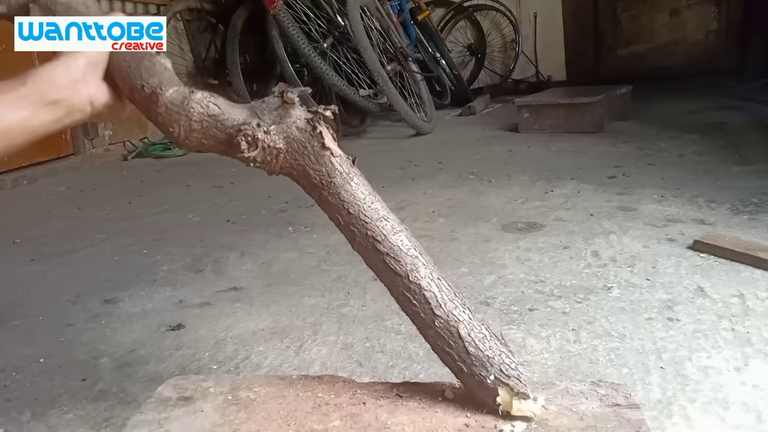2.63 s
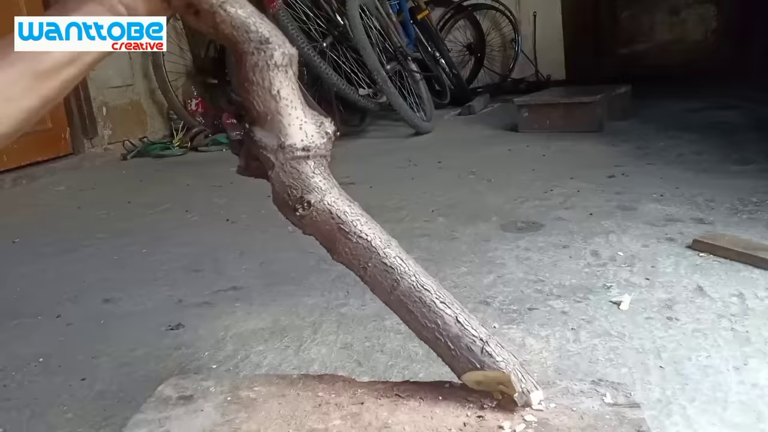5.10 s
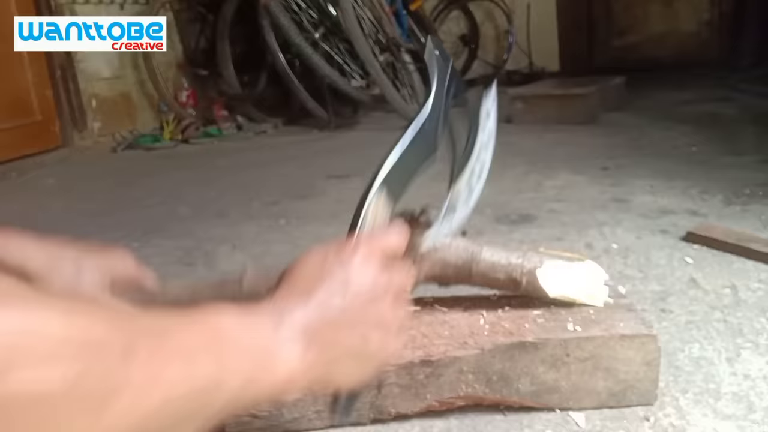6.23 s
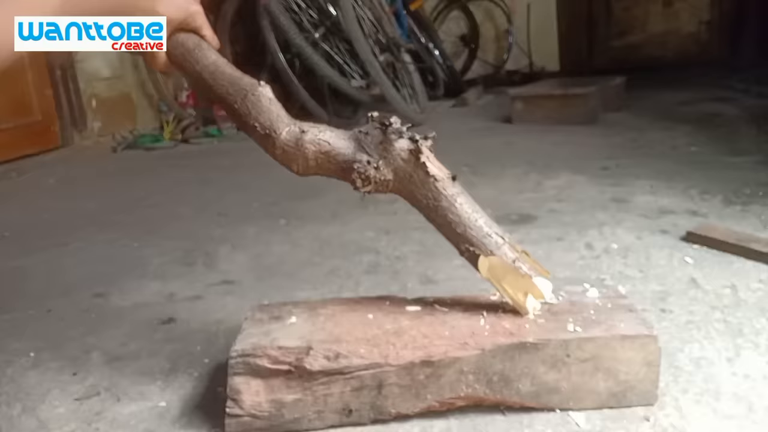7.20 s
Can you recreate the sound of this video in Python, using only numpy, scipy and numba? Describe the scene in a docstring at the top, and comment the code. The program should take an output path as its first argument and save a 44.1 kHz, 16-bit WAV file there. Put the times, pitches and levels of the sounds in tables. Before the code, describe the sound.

A close stereo pickup in a walled yard with short hard echoes, over low far traffic rumble, a soft broad hum and thin hiss. From 0 to 0.6 seconds tiny chips tick down and steel rings very faintly. A light tap at 1.0 leads through a faint swish to a loud cracking chop at 1.65, with woody rattles and bouncing pieces until about 1.95, then an instant dip. A tap at 2.3 and a ringing chop at 3.0 bring small knocks, brief squeaks, a faint gliding bird near 3.8 and two wooden knocks around 4.0. A tap at 4.9 precedes another sharp chop at 5.5, then falling chips and faint squeaks near 5.9. The level dips briefly at 6.2, with dull soft knocks around 6.4. A brighter tap at 6.95 leads to the last heavy chop at 7.6, with a thumping block and a few dropping chips until about 8.1.

```python
"""A walled yard: a steel axe chops a branch on a wooden block, close to two microphone ports that hear it differently.
Chips drop and the blade rings faintly, then light taps aim four chops, each led by a swish; wood bounces and knocks after.
The second chop brings squeaks and a far gliding bird, the third more squeaks; the level dips near 2.0 and 6.2 s.
Noise and a jolt make each crack, ring branch and block and set off decaying noise for the walls; tones are wavering sines.
Shaped noise lies under it all: far traffic rumble, a broad hum and a thin hiss."""
import sys
import numpy as np
from scipy import signal
from scipy.fft import rfft, irfft, next_fast_len
from scipy.io import wavfile
from scipy.ndimage import uniform_filter1d, map_coordinates
from numba import njit

SR = 44100
rng = np.random.default_rng(int(sys.argv[2]) if len(sys.argv) > 2 else 0)


def dump(signal):
    """Clip the signal to [-1, 1] and save it as 16-bit WAV at the path in sys.argv[1]."""
    limited = np.clip(np.atleast_2d(signal).T, -1, 1)
    pcm = np.round(limited * 32767).astype(np.int16)
    wavfile.write(sys.argv[1], SR, pcm)


def ratio(d):
    """dB to gain"""
    e = np.asarray(d, float) / 20
    return 10 ** e


N = 359856

# Levels are as at the source: port colour, pan, dips and gain control come later.
# Steel edge on the branch, full chops and light aiming taps; the jolt comes 1 ms after t, as in all contact tables:
# (t/s, crack peak level/dB, block level/dB, branch level/dB, branch f/Hz, edge brightness/dB)
CHOPS = [(0.9825, -25, -32, -38.5, 1580, -11.5), (1.6573, 1.5, -10.5, 3.5, 1000, -11.5),
         (2.3396, -25.5, -29.5, -43, 1470, -10.5), (2.9991, -5.5, -30.5, -8.5, 1480, -8),
         (4.8986, -30, -35, -36, 872, -9.5), (5.5297, -3.5, -15.5, -4, 1420, -11.5),
         (6.951, -24.5, -33.5, -41.5, 1130, -3.5), (7.6188, -1.5, -5.5, -5.5, 1290, -7)]
# Cut pieces bouncing near the listener, with little of the walls:
# (t/s, crack peak level/dB, block level/dB, block f/Hz, branch level/dB, branch f/Hz)
BOUNCES = [(1.7906, -7.5, -15.5, 209, -7.5, 1340), (1.8137, -21, -39.5, 412, -31, 1320),
           (1.8221, 2.5, -12.5, 320, -6, 1320), (1.8999, -12.5, -25, 450, -27, 1540),
           (1.9267, -31.5, -15.5, 452, -24, 1405), (1.9457, -23, -17, 460, -21, 858),
           (3.2234, -39, -28.5, 268, -34.5, 1370), (1.9365, -27.5, -21.5, 425, -23.5, 1200)]
# Wood on wood as the branch jolts and rocks on the block: columns as for the bounces
KNOCKS = [(1.6679, -9, -10, 212, 8.5, 1160), (1.6814, -3.5, -33, 258, -14, 1130),
          (1.705, -34.5, -20, 266, -8, 1170), (3.0072, -13, -11, 245, -2.5, 926),
          (3.0414, -16, -17, 217, -11.5, 1100), (3.2911, -26, -51.5, 270, -37, 1370),
          (3.2989, -20, -36.5, 325, -28, 1510), (3.3113, -41, -52.5, 345, -53, 947),
          (3.3737, -46, -54, 338, -37, 1400), (3.3961, -34, -54.5, 480, -53, 939),
          (3.4017, -22.5, -55, 444, -32, 870), (3.4144, -32, -40.5, 360, -41, 880),
          (3.9748, -18, -9, 430, -10.5, 680), (3.98, -16, -30, 400, -14, 1960),
          (4.0444, -26.5, -25, 180, -45, 770), (1.754, -42, -22, 257, -27, 900),
          (6.403, -59, -26.5, 282, -60, 805), (4.9579, -68, -34.5, 233, -71, 783),
          (5.54, -27, -16, 248, -8, 1080), (6.3814, -48, -20, 248, -52.5, 866),
          (6.4373, -45, -30.5, 294, -39, 1000), (7.6815, -13.5, -9.5, 273, 0, 1330),
          (7.6914, -43, -15.5, 340, -8.5, 1480), (8.1044, -50, -38, 231, -64, 740)]
# Chips and bark dropping round the yard, the further the wetter:
# (t/s, crack peak level/dB, pan/dB, walls level/dB)
CHIPS = [(0.0458, -35, -18, -15), (0.3072, -36, 9, -3), (0.493, -42, -11, -5.5), (0.614, -31, 9, 2),
         (0.63, -36.5, -2, 1.5), (0.321, -41.5, 2, -0.5), (2.1245, -51, -13.5, 2.5),
         (3.2166, -37.5, 15, -14), (3.4909, -32, 5, -3.5), (3.6146, -54, -23, 0.5), (4.2108, -46, 18, -1.5),
         (5.7, -36.5, 6, -8), (5.717, -41.5, 0, -4), (3.265, -48, 2, -11), (3.632, -63, 2, 2),
         (5.7815, -49.5, -10, -13), (5.8571, -50, -2, 2), (5.9929, -46.5, 9, -2), (6.0096, -51.5, -9, -0.5),
         (6.0279, -45.5, -6, -3), (6.1409, -52.5, -10.5, 4), (7.8236, -37, 19, -5.5),
         (7.8668, -39, 13, -18), (7.9925, -44.5, 1, -3)]
# Colour of a crack: (f/Hz, level/dB per Hz)
CRACK_COLOUR = [(900, -10.5), (1800, -5), (2600, 1), (3300, -8), (4200, -6.5), (5200, -5), (6500, -17.5),
                (9000, -26), (13000, -17), (15500, -43)]
# Modes of the branch: (f/Hz, width/Hz, level/dB)
BRANCH_MODES = [(624, 170, -0.5), (738, 37, -3.5), (813, 110, -1.5), (975, 27, 4), (1000, 21, 3.5),
                (1094, 73, 0.5), (1208, 80, -3), (1386, 52, -0.5), (1557, 39, -1.5), (1670, 76, -2),
                (2136, 200, -22)]
# Modes of the block: (f/Hz, width/Hz, level/dB)
BLOCK_MODES = [(150, 50, -5), (190, 45, -3), (232, 32, 0), (285, 45, -2), (335, 45, 0), (435, 40, -1),
               (520, 50, -4)]
# Decay of the yard walls: (f/Hz, t60/s)
WALL_DECAY = [(150, 0.26), (400, 0.35), (1000, 0.24), (2800, 0.29), (7000, 0.32), (14000, 0.066)]
# Port sensitivity to near blows: (f/Hz, L-R level/dB)
PORT_BALANCE = [(60, -3), (110, -4), (200, -13), (380, -14), (700, -6), (1290, -12.5), (2380, -6),
                (4400, 8), (8120, 6.5), (15000, 3.5)]
# Phase by which the left port leads for near blows: (f/Hz, phase/rad)
PORT_LEAD = [(700, -5.5), (1380, -0.8), (2000, 4.5), (3100, 4), (4200, 6), (7000, 8), (16000, 8.5)]
# Axe through the air: (end t/s, length/s, final level/dB)
SWINGS = [(1.64, 0.45, -59), (2.995, 0.19, -63), (5.515, 0.06, -59), (7.611, 0.11, -59)]
# Colour of the air round the blade: (f/Hz, level/dB per Hz)
SWISH_COLOUR = [(150, -37.5), (350, -1.5), (900, 2), (1500, -16.5), (3000, -47.5)]
# Ring of the steel blade: (f/Hz, level/dB, t60/s)
STEEL_TONES = [(2396, -45.5, 0.26), (2750, -54.5, 1.66)]
# Short rough squeaks: (t/s, length/s, f/Hz, level/dB)
SQUEAKS = [(3.3, 0.085, 3070, -41.5), (3.32, .06, 2950, -52), (3.542, 0.043, 3080, -48),
           (3.677, 0.099, 736, -47), (5.903, 0.12, 2390, -51.5), (5.922, 0.36, 2256, -62),
           (5.883, 0.16, 4380, -69.5), (5.917, 0.1, 5800, -67.5)]
# Bird calls: (t/s, length/s, start f/Hz, end f/Hz, level/dB)
BIRD_CALLS = [(3.764, .15, 6100, 6930, -66.5), (3.86, 0.17, 6800, 7920, -77)]
# Course of the background: (t/s, hum level/dB, hiss level/dB)
TOWN_COURSE = [(0, -60.5, -72), (.7, -63, -72.5), (1.6, -62, -77), (2.001, -63, -74.5), (2.498, -64.5, -77),
               (3.302, -65.5, -77.5), (4.3, -66, -77), (5.399, -67, -81), (6.22, -64.5, -72.5),
               (6.25, -59, -72), (6.699, -58, -67), (7.1, -59.5, -72), (8.16, -62, -72)]
# Colour of the traffic rumble: (f/Hz, level/dB per Hz)
RUMBLE_COLOUR = [(15, -51), (25, -36.5), (38, -27), (70, -6), (129, -1), (268, -18), (300, -22),
                 (390, -41.5), (660, -120)]
# Colour of the broad hum: (f/Hz, level/dB per Hz)
HUM_COLOUR = [(120, -48), (200, -12), (356, -5), (493, -7), (666, -9.5), (878, -11), (1330, -13.5),
              (2110, -11), (4000, -26), (5200, -63.5), (8800, -120)]
# Colour of the hiss: (f/Hz, level/dB per Hz)
HISS_COLOUR = [(1880, -27.5), (3200, -7.5), (3330, -15), (4410, -3.5), (5140, -2), (6080, -6.5),
               (6850, 3.5), (7780, -9.5), (13500, -13), (15000, -21.5), (15800, -10)]
# Likeness of the two sides in steady noise: (f/Hz, correlation from -1 to 1)
SIDE_LIKENESS = [(60, 0.93), (130, 1), (290, 0.68), (640, 0.96), (1410, -0.17), (3100, 0.053), (6820, -0.8),
                 (15000, 1)]
# Side balance of steady noise: (f/Hz, L-R level/dB)
NOISE_BALANCE = [(60, 0.5), (150, -2.5), (380, -2.5), (950, -5), (2380, -6.5), (5980, 5.5), (15000, -4)]
# Brief dips in level, where earlier contact tails also end: (t/s)
DIPS = [1.997, 6.235]

LENGTH = 24576  # samples of one contact with its tail
BITE_S, SLAP_S = 0.0015, 0.0005  # rise times: the edge sinks in, wood slaps at once
# Two thirds of a pan becomes the L-R level difference, before the ports' own.
CHOP_BLOCK_HZ, CHOP_PAN_DB, CHOP_WALLS_DB = 233.6, -0.5, -2.5
BOUNCE_EDGE_DB, BOUNCE_PAN_DB, BOUNCE_WALLS_DB = -19.5, 3.5, -16.5
KNOCK_EDGE_DB, KNOCK_PAN_DB, KNOCK_WALLS_DB = -20.5, 4.5, -4
CHIP_EDGE_DB, CHIP_BODY_DB, CHIP_HZ = -8.5, -12, 1400  # body level is relative to the crack
SPLINTERS_DB, SPLINTERS_T60_S, SPLINTERS_PER_S = -21.5, 0.27, 310
SCATTER_DB = 2.5  # spread of each mode's level from blow to blow
BLOCK_FAR_DB, FAR_RING_S = -2, 0.004  # the block reaches the walls weakly; wood sent there is damped
ECHO_LUMPS_DB = 2  # separate surfaces answer one after another
STEEL_S = 0.492  # the blade is touched
SQUEAK_WAVER_HZ, SQUEAK_FLUTTER_DB, SQUEAK_FALL_DB = 69, 4.5, 8.5  # waver at 3 kHz, less for low squeaks
BIRD_WAVER_HZ, BIRD_FLUTTER_DB = 180, 2.5
RUMBLE_DB = 9  # over the hum
TOP_HZ = 15900


def unit(x):
    """Scale to rms 1."""
    return x / np.sqrt(np.mean(x ** 2) + 1e-20)


def peak(x):
    """Scale to peak 1."""
    return x / np.abs(x).max()


def along(points, hz):
    """Read (f/Hz, value) points on a log frequency axis."""
    f, value = np.transpose(points)
    return np.interp(np.log(hz + 1), np.log(f + 1), value)


def filtered(x, response):
    """Multiply the spectrum of x by a response of frequency."""
    m = next_fast_len(x.shape[-1] + 8192)
    hz = np.fft.rfftfreq(m, 1 / SR)
    return irfft(rfft(x, m) * response(hz), m)[..., :x.shape[-1]]


def balance(points):
    """Give half of the left-right level difference to each side."""
    return lambda hz: ratio(np.outer([0.5, -0.5], along(points, hz)))


def ring(push, modes, near_hz, octaves):
    """Resonant wood modes: those near near_hz, set by where the blow lands, answer most."""
    gains = []
    for f0, _, db in modes:
        distance = np.log2(f0 / near_hz) / octaves
        gains.append(ratio(db + rng.normal(0, SCATTER_DB) - 6 * distance ** 2))

    def body(f):
        total = 0
        for k, ((f0, width, _), gain) in enumerate(zip(modes, gains)):
            resonance = 1j * f * width / (f0 * f0 - f * f + 1j * f * width)
            total = total + (-1) ** k * gain * resonance  # neighbours in opposite phase
        return total
    return peak(filtered(push, body))


def walls():
    """The yard's echo: a fresh stereo noise tail in which each frequency dies at its own speed."""
    hz, t, z = signal.stft(rng.standard_normal((2, LENGTH)), SR, nperseg=256)
    decay = ratio(-60 * t / along(WALL_DECAY, hz)[:, None])
    tail = signal.istft(z * decay, SR, nperseg=256)[1][:, :LENGTH]
    tail = tail * np.clip(np.arange(LENGTH) / (0.00097 * SR), 0, 1)  # echoes build up
    lumps = unit(uniform_filter1d(rng.standard_normal(LENGTH), size=130))
    tail = tail * ratio(ECHO_LUMPS_DB * lumps)
    return tail / np.linalg.norm(tail[0])


def contact(db, block_db, block_hz, branch_db, branch_hz, edge_db, pan_db, walls_db, rise_s):
    """Fibres crack ever louder while the edge bites; its stop rings branch and block, and the walls answer."""
    t = np.arange(4096) / SR - 0.004
    bite = np.where(t < 0, np.exp(t / rise_s), np.exp(-t / 0.0039))
    stop = 1.0 * (np.arange(len(t)) == np.argmax(bite))

    def fibres(share):  # one jolt among tearing fibres
        return stop + share * bite * rng.standard_normal(len(t))

    def edge(f):  # the brightness step rises over half an octave from 2.8 kHz
        return ratio(along(CRACK_COLOUR, f) + (edge_db + 5.5) * np.clip(np.log2(f / 2800 + 1e-9) * 2, 0, 1))

    def soft(x, corner_hz):
        return filtered(x, lambda f: 1 / (1 + 1j * f / corner_hz) ** 2)

    crack = ratio(db) * peak(filtered(fibres(share=1.0), edge))
    snap = filtered(stop, edge)  # the walls hear all directions: the same colour, smooth
    shake = soft(fibres(share=0.05), 3000)  # wood is a soft contact
    rocking = np.where(t < 0, bite, np.exp(-t / 0.023)) * rng.standard_normal(len(t))
    thump = soft(stop + 0.052 * rocking, 700)  # the block rocks on the ground
    ground = ratio(block_db - 37.5) * peak(soft(bite, 60))  # a low push through the floor
    branch = ratio(branch_db) * ring(shake, BRANCH_MODES, branch_hz, octaves=0.78)
    block = ratio(block_db) * ring(thump, BLOCK_MODES, block_hz, octaves=0.48)

    far = branch + ratio(BLOCK_FAR_DB) * block
    far_wood = far.std() * unit(far * np.exp(-t / FAR_RING_S))  # from afar broader, less pitched
    sent = far_wood + crack.std() * unit(snap)
    out = ratio(walls_db) * signal.fftconvolve(sent[None], walls(), axes=1)[:, :LENGTH]
    out[:, :len(t)] += crack + branch + block + ground
    return out * ratio([[pan_db / 3], [-pan_db / 3]])


def splinters(db):
    """Torn fibres go on crackling after a chop: sparse bright ticks that die away."""
    t = np.arange(LENGTH) / SR
    ticks = (rng.random(LENGTH) < SPLINTERS_PER_S / SR) * rng.standard_normal(LENGTH)
    bright = filtered(ticks, lambda f: ratio(along(CRACK_COLOUR, f)) * (f / 6000) ** 2)
    return ratio(db + SPLINTERS_DB - 60 * t / SPLINTERS_T60_S) * (t > 0.004) * unit(bright)


def chopping():
    """All contacts in place at the two ports, which differ in level and phase; a dip ends earlier tails."""
    sounds = []
    for s, db, block_db, branch_db, branch_hz, edge_db in CHOPS:
        chop = contact(db, block_db, CHOP_BLOCK_HZ, branch_db, branch_hz,
                       edge_db, CHOP_PAN_DB, CHOP_WALLS_DB, BITE_S)
        sounds.append((s, chop + splinters(db + edge_db)))
    for s, *row in BOUNCES:
        sounds.append((s, contact(*row, BOUNCE_EDGE_DB, BOUNCE_PAN_DB, BOUNCE_WALLS_DB, SLAP_S)))
    for s, *row in KNOCKS:
        sounds.append((s, contact(*row, KNOCK_EDGE_DB, KNOCK_PAN_DB, KNOCK_WALLS_DB, SLAP_S)))
    for s, db, pan_db, walls_db in CHIPS:  # the block is all but silent
        chip = contact(db, -120, CHOP_BLOCK_HZ, db + CHIP_BODY_DB, CHIP_HZ,
                       CHIP_EDGE_DB, pan_db, walls_db, SLAP_S)
        sounds.append((s, chip))

    out = np.zeros((2, N + LENGTH))
    for s, sound in sounds:
        start = round((s - 0.003) * SR)
        end = min([round(dip * SR) - start for dip in DIPS if dip > s] + [LENGTH])
        out[:, start:start + end] += sound[:, :end]

    def two_ports(hz):
        lead = np.exp(1j * np.outer([0.5, -0.5], along(PORT_LEAD, hz)))
        return balance(PORT_BALANCE)(hz) * lead * hz / (hz + 20)  # the lowest bass is weakened
    return filtered(out[:, :N], two_ports)


def rush(colour, patchy_db):
    """Stereo noise of mid rms 1 with patches of random gain in time and frequency."""
    z = signal.stft(rng.standard_normal((2, N)), nperseg=512)[2]
    field = uniform_filter1d(rng.standard_normal(z.shape[1:]), size=5, axis=0)
    field = uniform_filter1d(field, size=10, axis=1)
    pair = signal.istft(z * ratio(patchy_db * unit(field)), nperseg=512)[1][:, :N]

    def mid_side(hz):  # shares that give the wanted left-right likeness
        angle = np.arccos(np.clip(along(SIDE_LIKENESS, hz), -1, 1)) / 2
        return ratio(along(colour, hz)) * [np.cos(angle), np.sin(angle)]
    mid, side = filtered(pair, mid_side)
    return np.array([mid + side, mid - side]) / mid.std()


def swings():
    """Air rushes round the blade: noise that swells up to each big blow."""
    t = np.arange(N) / SR
    swell = np.zeros(N)
    for end, length, db in SWINGS:
        swell += ratio(db) * np.clip(1 - (end - t) / length, 0, 1) * (t < end)
    return swell * filtered(rush(SWISH_COLOUR, patchy_db=2), balance(NOISE_BALANCE))


def tones(rows):
    """Faint sines that glide, waver in pitch, flutter in level and fall by fall_db over their length."""
    out = np.zeros(N + SR)
    for s, length, start_hz, end_hz, db, waver_hz, flutter_db, fall_db in rows:
        u = np.linspace(0, 1, round(length * SR))
        waver = waver_hz * unit(uniform_filter1d(rng.standard_normal(SR), size=60))[:len(u)]
        slow_noise = np.convolve(rng.standard_normal(SR), np.hanning(500), 'same')
        flutter = flutter_db * unit(slow_noise)[:len(u)]  # dB
        hz = start_hz + (end_hz - start_hz) * np.sqrt(u) + waver
        phase = 2 * np.pi * np.cumsum(hz) / SR
        fades = np.clip(np.minimum(u, 1 - u) * length / 0.019, 0, 1)
        out[round(s * SR):][:len(u)] += fades * ratio(db - fall_db * u + flutter) * np.sin(phase)
    return out[:N] * ratio([[-2], [2]])  # stronger on the right


def steel_ring():
    """The touched blade rings at steady pitches, heard through the first 18 dB of decay."""
    return tones([(STEEL_S, t60 * 0.3, hz, hz, db, 3, 0, 18) for hz, db, t60 in STEEL_TONES])


def squeaks():
    """Short squeaks, rough because their pitch wavers and their level flutters."""
    return tones([(s, length, hz, hz, db, SQUEAK_WAVER_HZ * np.sqrt(hz / 3000), SQUEAK_FLUTTER_DB, SQUEAK_FALL_DB)
                  for s, length, hz, db in SQUEAKS])


def far_bird():
    """A far bird's calls glide upward, fast at first, with a wavering pitch."""
    return tones([(*row, BIRD_WAVER_HZ, BIRD_FLUTTER_DB, 2) for row in BIRD_CALLS])


def wobble(rate):
    """A smooth random curve with rate knots a second."""
    knots = rng.standard_normal(int(N * rate / SR) + 4)
    return map_coordinates(knots, [np.arange(N) * rate / SR])


def town():
    """Far traffic rumble and a broad hum rise and fall together as noise; a thin hiss lies on top."""
    s, *levels = np.transpose(TOWN_COURSE)
    town_db, hiss_db = [np.interp(np.arange(N) / SR, s, level) for level in levels]
    rumble = ratio(town_db + RUMBLE_DB + 0.43 * wobble(21.0)) * rush(RUMBLE_COLOUR, patchy_db=2.04)
    hum = ratio(town_db + 0.3 * wobble(6)) * rush(HUM_COLOUR, patchy_db=0.7)
    hiss = ratio(hiss_db + 0.6 * wobble(8)) * rush(HISS_COLOUR, patchy_db=1.0)
    return filtered(rumble + hum + hiss, balance(NOISE_BALANCE))


def scene():
    """Chopping over the town; the whole level dips to a tenth for an instant at each of the DIPS."""
    t = np.arange(N) / SR
    dips = np.prod([np.clip(np.abs(t - dip) / 0.0042, 0.1, 1) for dip in DIPS], axis=0)
    return (chopping() + swings() + steel_ring() + squeaks() + far_bird() + town()) * dips


@njit
def follow(level, attack, release):
    """Envelope that climbs fast and sinks slowly."""
    out, held = np.empty_like(level), 0.0
    for i in range(len(level)):
        held += (level[i] - held) * (attack if level[i] > held else release)
        out[i] = held
    return out


def roll_off(x):
    """The treble ends steeply here."""
    return signal.sosfilt(signal.butter(12, 16430, fs=SR, output="sos"), x)


def record(dry):
    """Band limit; gain control ducks just after loud blows and recovers; peaks bend at full scale."""
    x = filtered(dry, lambda hz: hz < TOP_HZ)
    level = follow(np.abs(x).max(axis=0), 1 / (0.005 * SR), 1 / (0.055 * SR))  # 5 ms up, 55 ms down
    duck = np.maximum(level / ratio(-25), 1) ** -0.45  # acts above -25 dB
    x = x * duck * ratio(1.5)
    mix = x / (1 + np.abs(x) ** 6) ** (1 / 6)
    return roll_off(mix)


dry = scene()
out = record(dry)
dump(out)
```